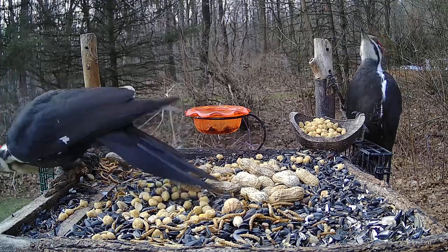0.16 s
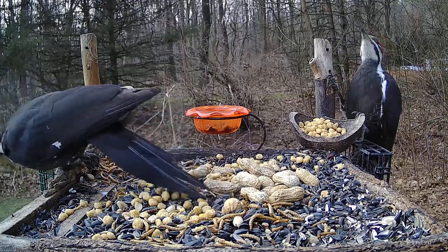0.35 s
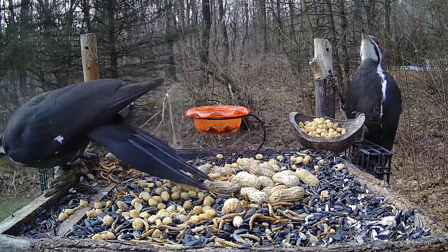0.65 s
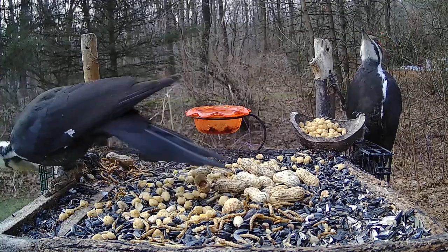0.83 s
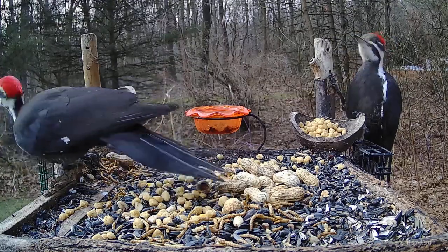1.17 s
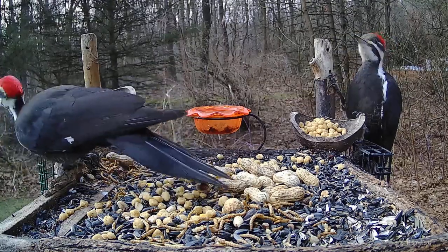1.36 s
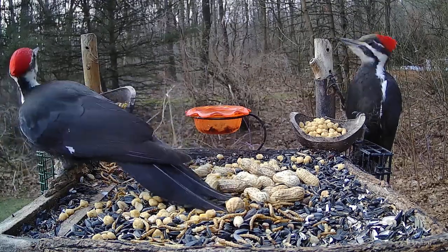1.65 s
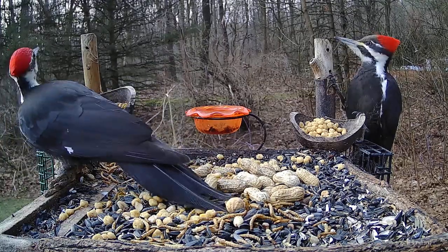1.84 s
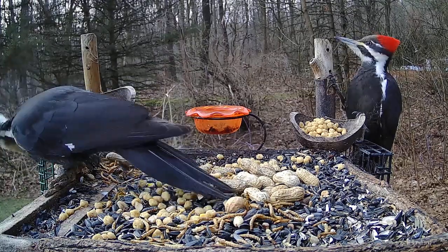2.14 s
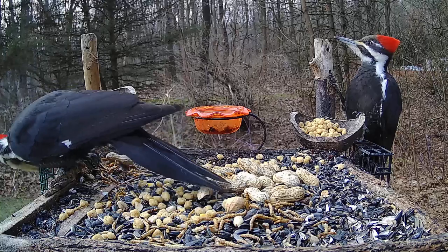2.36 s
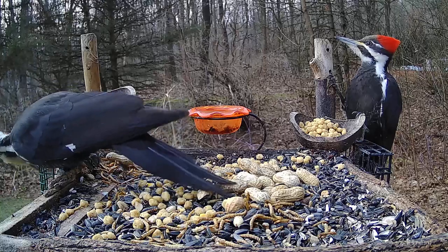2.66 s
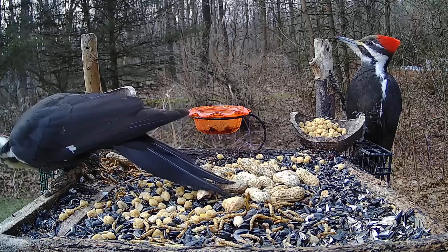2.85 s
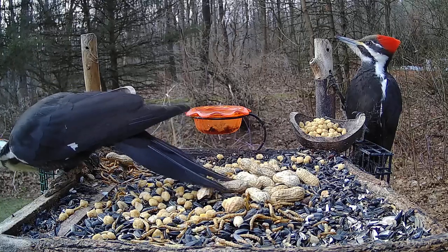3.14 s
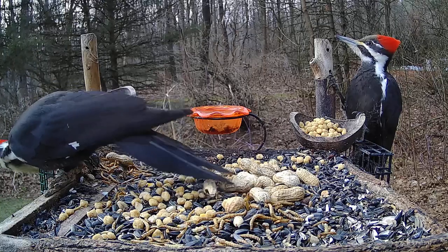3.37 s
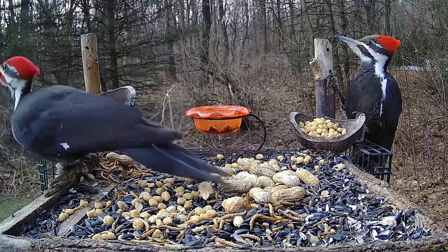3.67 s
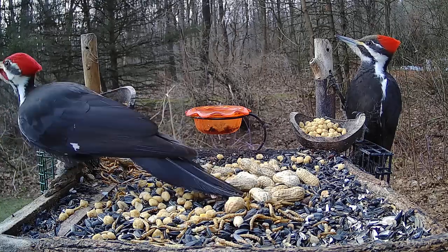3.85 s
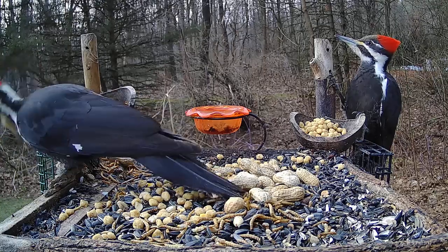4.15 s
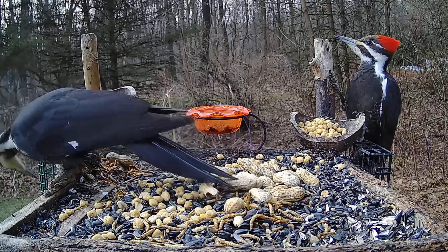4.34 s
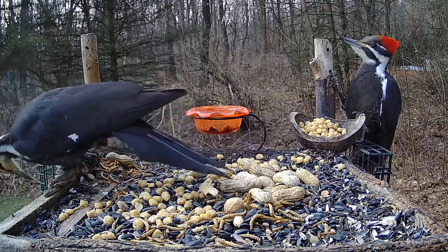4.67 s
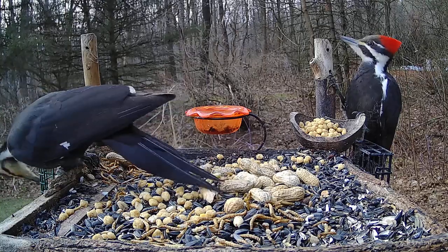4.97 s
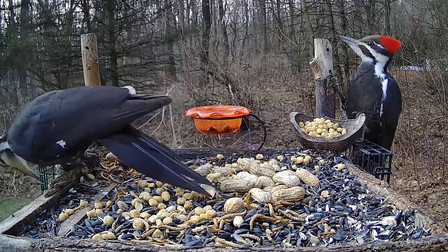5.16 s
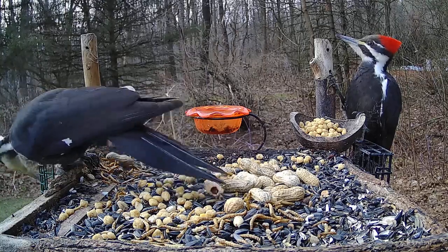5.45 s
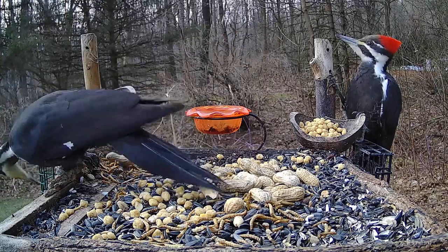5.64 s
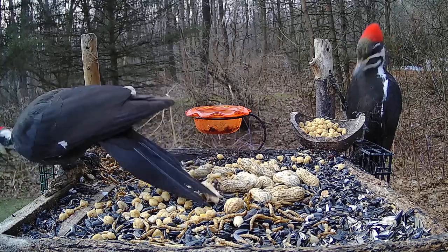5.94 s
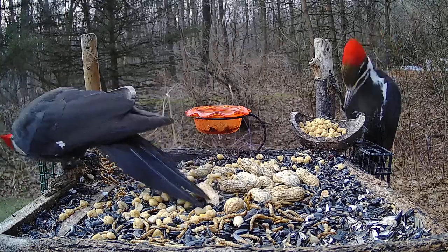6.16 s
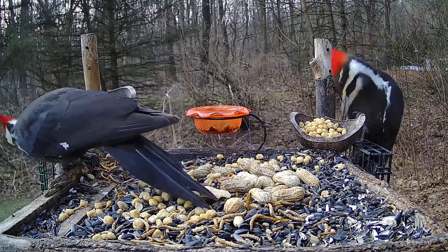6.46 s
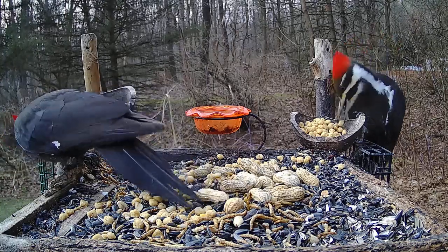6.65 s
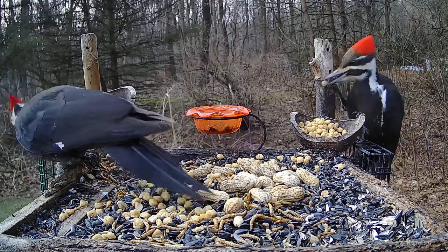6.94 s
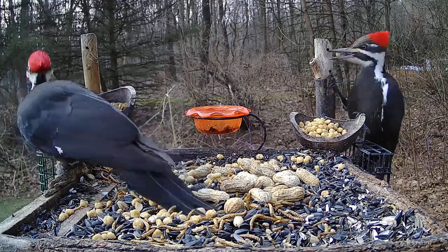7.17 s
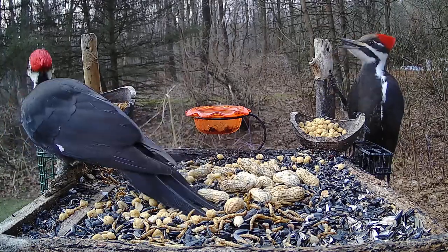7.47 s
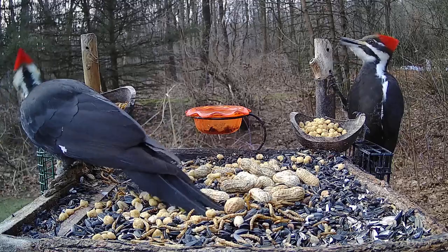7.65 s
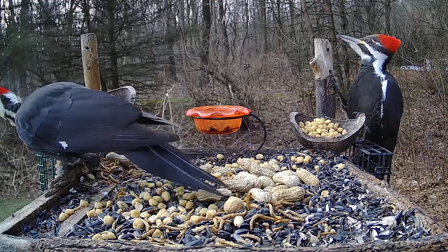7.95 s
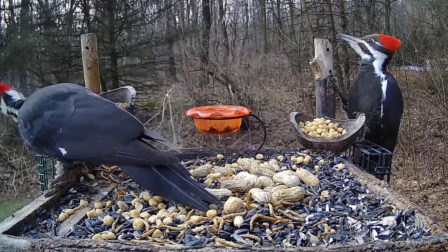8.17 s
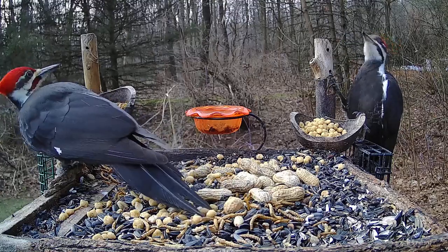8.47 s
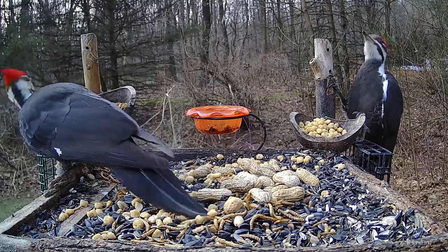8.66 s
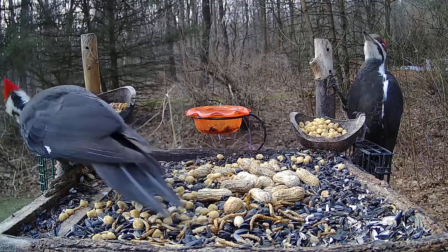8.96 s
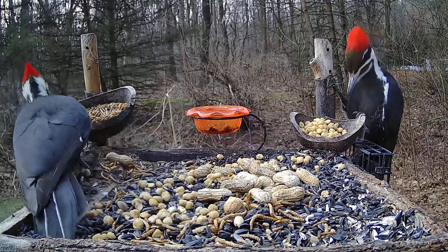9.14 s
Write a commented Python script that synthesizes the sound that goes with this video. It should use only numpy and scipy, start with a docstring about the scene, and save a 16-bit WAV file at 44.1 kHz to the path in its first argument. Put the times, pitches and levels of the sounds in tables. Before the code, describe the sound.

A quiet outdoor bed of distant low rumble, thin hiss and a barely audible high whine. Far engine hum swells over the first 2.5 seconds; another overlaps from about 1 and fades around 6. Close hollow woodpecker blows land on the wooden tray at 0.45, 0.7 and 1.05, growing stronger, with seed crunch, shell snaps, loose clatter and a deep post sway. Weaker, duller knocks come at 2.6, 3.2, 3.65 and 5.3, then the hardest at 5.65. A second bird knocks a side cup at 6.5, followed by a very faint peck, a rub and small taps around 7. Sharp rising chips recur roughly every second until 8.25, clearest from 4 to 6, among tiny pips. Nasal falling mews echo at 1.7, 4.35, 6 and 8.6. Faint warbles appear near 3.7 and 8; distant hoarse cawing runs from 4 to 7.8, clearest at 5.8. Faint taps end near 9.3.

```python
"""Low rumble, thin hiss and the hum of far engines; then a big woodpecker hammers at a wooden feeder. Each blow
builds up ringing board modes beside a crunch of noise, and a slow post sway; loose seed and fittings clack as
noise bursts. A second bird pecks a side cup. Birds chip, pip, mew, warble and caw as gliding sines with noise-
made echoes of the winter woods. The hum swells as the engines' firing rate passes a resonance."""
import sys
import numpy as np
from scipy import signal
from scipy.fft import rfft, irfft
from scipy.io import wavfile
from scipy.ndimage import uniform_filter1d

SR = 44100
rng = np.random.default_rng(int(sys.argv[2]) if len(sys.argv) > 2 else 0)


def file_out(sig):
    """Save sig as 16-bit WAV at sys.argv[1]."""
    # one column per channel
    cols = np.atleast_2d(sig).T
    # limit, then scale
    lim = np.clip(cols, -1, 1)
    pcm = np.round(lim * 32767).astype(np.int16)
    wavfile.write(sys.argv[1], SR, pcm)


N = 410571
T = np.arange(N) / SR


def undb(db):
    """Decibels to gain."""
    return 10 ** (np.asarray(db) / 20)


def unit(x):
    """Scale to rms 1."""
    return x / np.sqrt(np.mean(x ** 2))


def add(out, start_s, x):
    """Mix x into out from start_s."""
    i = max(int(start_s * SR), 0)
    out[i:i + len(x)] += x[:max(N - i, 0)]


def curves(rows, t):
    """Columns of a table joined by straight lines in time."""
    time_s, *columns = np.transpose(rows)
    return [np.interp(t, time_s, column) for column in columns]


def band(x, lo_hz, hi_hz, order=2):
    """Causal band-pass."""
    top_hz = min(max(hi_hz, lo_hz + 10), SR / 2 - 10)
    sos = signal.butter(order, [lo_hz, top_hz], "band", fs=SR, output="sos")
    return signal.sosfilt(sos, x)


def coloured(points, size):
    """Noise with a given level per Hz, interpolated over log frequency."""
    hz, db = np.transpose(points)
    f = np.maximum(np.fft.rfftfreq(size, 1 / SR), 1)
    gain = undb(np.interp(np.log(f), np.log(hz), db))
    return irfft(rfft(rng.standard_normal(size)) * gain, size) * np.sqrt(SR / 2)


def walk(rate_hz, size=N):
    """Smooth random wander of spread 1: held random values, averaged twice."""
    k = max(int(SR / rate_hz), 1)
    held = np.repeat(rng.standard_normal(size // k + 2), k)
    return unit(uniform_filter1d(uniform_filter1d(held, k), k))[:size]


def phase_of(hz):
    """Running phase of a moving pitch."""
    return 2 * np.pi * np.cumsum(hz) / SR


def fade(t, t60_s):
    """Exponential decay by 60 dB in t60_s."""
    return np.exp(-np.log(1000) * t / t60_s)


def gate(t, start_s, end_s, attack_s, release_s):
    """Straight rise, hold at 1, straight fall."""
    return np.clip(np.minimum((t - start_s) / attack_s, (end_s - t) / release_s), 0, 1)


def woods(x, t60_s):
    """Diffuse echo scattered by the trunks: x convolved with decaying noise of unit energy."""
    t = T[:SR]
    echo = rng.standard_normal(SR) * fade(t, t60_s) * (1 - np.exp(-t / 0.0091))
    return signal.fftconvolve(x, echo / np.sqrt(np.sum(echo ** 2)))[:N]


def air():
    """Distant rumble that eases slowly, under thin hiss: one coloured noise split at 900 Hz."""
    # outdoor rumble and microphone hiss: hz, density_db_per_hz
    air_spectrum = [(15, -63.5), (30, -64), (70, -68), (110, -72.5), (150, -82.5), (300, -85), (430, -90.5),
                    (560, -88), (780, -103), (1500, -107.5), (2900, -111), (4000, -114.5), (11000, -113.8),
                    (15500, -117.3)]
    # ease of the rumble: time_s, gain_db
    rumble_ease = [(0, -0.37), (6.0, .5), (7.5, -1.4)]
    noise = coloured(air_spectrum, N)
    ease_db, = curves(rumble_ease, T)
    rumble = signal.sosfiltfilt(signal.butter(2, 900, fs=SR, output="sos"), noise)
    drone = undb(-69.0 + 2 * walk(1.89)) * unit(band(rng.standard_normal(N), 529.5, 589))
    rumble_db = ease_db + .5 * walk(5)
    hiss = (noise - rumble) * undb(.55 * walk(7))
    return hiss + (rumble + drone) * undb(rumble_db)


def engine():
    """Far engines: firing tone, half and double rate; the hum booms as the rate passes a resonance."""
    # one list per engine, gathering speed then easing off: time_s, firing_rate_hz
    engine_runs = [
        [(0, 111.9), (.55, 116.3), (1.3, 119.8), (2.05, 121.8), (2.5, 111.2)],
        [(1.1, 91), (3.25, 105.6), (3.55, 113.6), (5.55, 113.5), (5.9, 103.3), (6.3, 100)],
    ]
    base_db, fade_s = -55, .25
    boom_hz, boom_width_hz, boom_peak_db = 117.05, 4.8, 13
    out = np.zeros(N)
    for run in engine_runs:
        hz, = curves(run, T)
        phase = phase_of(hz * (1 + 0.0041 * walk(10.06)))
        tone = np.sin(phase) + undb(-8) * np.sin(phase / 2) + undb(-24) * np.sin(2 * phase)
        boom_db = boom_peak_db / (1 + ((hz - boom_hz) / boom_width_hz) ** 2)
        waver_db = 1.3 * walk(8)
        level = undb(base_db + boom_db + waver_db)
        out += level * gate(T, run[0][0], run[-1][0], fade_s, fade_s) * tone
    return out


def pips(count=46):
    """Tiny faint pips, as of a foraging flock: short wavering sines, one at random in each time slot."""
    out, t = np.zeros(N), T[:int(.016 * SR)]
    for k, (when, pitch, size) in enumerate(rng.uniform(-1, 1, (count, 3))):
        start_s = (k + .5 + when / 2) * T[-1] / count
        hz = 5650 + 70 * pitch + 110 * walk(450, len(t))
        pip = np.sin(phase_of(hz)) * np.hanning(len(t))
        add(out, start_s, undb(-70.0 + 3.0 * size) * pip)
    return out


def peck(knock_db, sway_db, ring_db, crack_db, build_s, tilt_db, wood):
    """One blow: the bill crunches in for some milliseconds while the boards build up their ring."""
    # dense small resonances of boards and seed: hz, relative_db
    grain_spectrum = [(80, -1.5), (280, -4.5), (600, -6.5), (880, -8), (1150, -3), (1400, -17),
                      (1600, -15.5), (1950, -13.5), (2300, -10.5), (2600, -20), (3250, -18), (3900, -32.5),
                      (6000, -40), (11000, -40), (16000, -58)]
    post_hz, post_t60_s = 46.9, 0.51
    t = T[:SR // 2]
    hz, db, t60_s = np.transpose(wood)[:, :, None]
    low = hz < 880
    # every blow lands on another spot, which detunes and weights the modes anew
    hz = hz * (1 + 0.0074 * rng.standard_normal(hz.shape))
    spot_db = 1.5 * rng.standard_normal(hz.shape)
    size = undb(db + low * tilt_db * np.log2(hz / 300) + spot_db)
    swell = 1 - np.exp(-(t / np.where(low, build_s, .006)) ** 2)
    ring = np.sin(2 * np.pi * (hz * t + rng.random(hz.shape)))
    modes = size * swell * fade(t, t60_s) * ring
    # seed and small resonances crunch as long as the bill pushes, with a weak tail
    onset = 1 - np.exp(-(t / 0.0045) ** 0.79)
    push = onset * (np.exp(-(t / 0.023) ** 2) + undb(-10) * fade(t, 0.27))
    grain = coloured(grain_spectrum, len(t)) * push * undb(2.4 * walk(377, len(t)))
    edges_hz = [80, 880, 1600, 16000]
    levels_db = (knock_db, ring_db, crack_db)
    grains_db = (-6, -0.5, 7)  # grain against modes
    out = 0
    for lo, hi, level_db, grain_db in zip(edges_hz, edges_hz[1:], levels_db, grains_db):
        band_modes = modes[(hz[:, 0] >= lo) & (hz[:, 0] < hi)].sum(0)
        part = unit(band_modes) + undb(grain_db) * unit(band(grain, lo, hi))
        out = out + undb(level_db) * part / np.std(part[:SR // 25])  # level over the first 40 ms
    # the post swings slowly after the blow
    sway = np.sin(2 * np.pi * post_hz * t) * fade(t, post_t60_s) * (1 - np.exp(-(t / 0.024) ** 2))
    return out + undb(sway_db) * sway


def contact(t, t60_s):
    """Noise of two hard surfaces meeting: sub-millisecond onset, exponential decay."""
    return rng.standard_normal(len(t)) * fade(t, t60_s) * (1 - np.exp(-t / 0.00055))


def rattle(clack_db, edge_db):
    """A small hard piece lands on the tray: a dry clack with a bright edge, each set by its peak."""
    t = T[:SR // 10]
    clack = band(contact(t, 0.026), 1010, 1444)
    edge = band(contact(t, 0.018), 2940, 3360) + undb(-25.5) * contact(t, 0.0054)
    return undb(clack_db) * clack / np.abs(clack).max() + undb(edge_db) * edge / np.abs(edge).max()


def chatter(knock_db):
    """Loose fittings jump at a blow and fall back one after another; a weak blow barely lifts them."""
    # same pieces at every tray blow; full_lift_db is the knock that lifts one fully:
    # delay_s, clack_db, edge_db, full_lift_db
    rebounds = [(.022, -33, -33.5, -25), (0.0394, -32.5, -43, -36), (.051, -46.5, -50, -29),
                (.063, -44.5, -61, -36.5), (.117, -47.5, -66, -34), (.130, -54, -69, -34)]
    # per dB short of full lift: weaker clack (dB), weaker edge (dB), later landing (s)
    clack_drop_db, edge_drop_db, lag_s = 2.5, 6.5, .0009
    out = np.zeros(N)
    for delay_s, clack_db, edge_db, full_lift_db in rebounds:
        short_db = max(full_lift_db - knock_db, 0)
        piece = rattle(clack_db - clack_drop_db * short_db, edge_db - edge_drop_db * short_db)
        add(out, delay_s + lag_s * short_db, piece)
    return out


def rub(middle_s, half_s, lo_hz, hi_hz, level_db):
    """Bill and claws rub over wood: uneven band noise that swells and dies."""
    t = T[:int(6 * half_s * SR)] - 3 * half_s
    noise = unit(band(rng.standard_normal(len(t)), lo_hz, hi_hz))
    grit = noise * undb(3.5 * walk(148.6, len(t)))
    return middle_s + t[0], undb(level_db) * grit * np.exp(-(t / half_s) ** 2)


def snap(peak_db):
    """A seed shell splits: a short burst of bright noise."""
    t = T[:SR // 30]
    burst = rng.standard_normal(len(t)) * fade(t, 0.01) * (1 - np.exp(-t / 0.00037))
    crack = band(burst, 2500, 7700, order=1)
    return undb(peak_db) * crack / np.abs(crack).max()


def feeder():
    """All blows, rattles, snaps and scrapes, carried to the microphone through the wood."""
    # blows of the bill on the tray: start_s, knock_db, hollow_ring_db, build_up_s, low_tilt_db_per_octave
    tray_pecks = [(0.452, -36, -47, .0059, -1.5), (0.729, -30, -45.5, 0.0075, 0),
                  (1.062, -27.5, -40, 0.0069, 0), (2.594, -47.5, -56.5, 0.014, -3),
                  (3.183, -38.5, -50, 0.022, 2), (3.657, -40.5, -54, 0.031, -0.5),
                  (5.315, -46, -60, 0.021, -2), (5.643, -25.5, -39, 0.0045, -1.5)]
    # modes of the feeder: hz, relative_db, t60_s
    tray_modes = [(122.4, -13.5, 0.43), (151, -5.5, 0.22), (192.3, -8, 0.33), (243.7, 0.5, 0.12),
                  (278, 2, 0.2), (301.7, -0.5, 0.19), (322, -4.5, 0.24), (387.7, -13, 0.24),
                  (464.6, -19, 0.22), (540, -13.5, 0.28), (743, -8.5, 0.15), (1112, 6.5, 0.12),
                  (1173, -7, 0.25), (1280, -2, 0.13), (1390, -6, 0.12), (1843, 0, 0.068), (2042, 1, 0.036),
                  (2252, 2.5, 0.042), (2750, 3, 0.028), (3140, 1, 0.041), (3350, -14, 0.042)]
    # second bird's blows in the side cup: start_s, knock_db, hollow_ring_db, build_up_s
    cup_pecks = [(6.468, -37, -47, 0.0055), (6.851, -64, -65, .008)]
    # modes of the side cup: hz, relative_db, t60_s
    cup_modes = [(247, -9, 0.092), (313.6, 1.5, 0.13), (333.4, -4, 0.27), (389, -5, 0.12),
                 (446, -20, 0.093), (546, -0.5, 0.13), (772, -4.5, 0.092), (1103, 6, 0.069),
                 (1200, -3, 0.067), (1300, -15, 0.052), (2000, 5, 0.048), (2330, 3, 0.047)]
    # light taps of bills and claws: start_s, clack_db, edge_db
    taps = [(2.72, -50, -70), (3.8492, -56, -71), (6.9478, -52, -72), (6.9701, -51.5, -75),
            (7.1199, -50.5, -61), (7.2878, -53, -64), (9.007, -57, -71), (9.296, -57, -69)]
    # sharp snaps of seed shell: start_s, peak_db
    snaps = [(0.735, -41), (0.836, -54), (1.058, -38), (1.0654, -46), (1.0829, -43), (2.194, -47),
             (6.9691, -50.5)]
    # rubs over wood: middle_s, half_length_s, low_hz, high_hz, level_db
    rubs = [(0.732, 0.0053, 700, 3400, -62), (5.382, 0.045, 910, 1340, -67),
            (5.454, .03, 1020, 1480, -68.5), (6.965, 0.085, 292, 319, -54.5),
            (9.301, 0.0087, 1090, 3280, -65)]
    # the crack keeps in step with the knock; the sway grows by fewer dB
    crack_re_knock_db, full_blow_db, full_sway_db, sway_db_per_db = -16.5, -25, -19.5, 0.6
    cup_crack_re_ring_db, cup_sway_db = -11, -43
    out = np.zeros(N)
    for start_s, knock_db, ring_db, build_s, tilt_db in tray_pecks:
        sway_db = full_sway_db + sway_db_per_db * (knock_db - full_blow_db)
        crack_db = knock_db + crack_re_knock_db
        add(out, start_s, peck(knock_db, sway_db, ring_db, crack_db, build_s, tilt_db, tray_modes))
        add(out, start_s, chatter(knock_db))
    for start_s, knock_db, ring_db, build_s in cup_pecks:
        crack_db = ring_db + cup_crack_re_ring_db
        blow = peck(knock_db, cup_sway_db, ring_db, crack_db, build_s, 0, cup_modes)
        add(out, start_s, band(blow, 30, 2700))  # the cup's side post passes little treble
    for rows, sound in ((taps, rattle), (snaps, snap)):
        for start_s, *row in rows:
            add(out, start_s, sound(*row))
    for row in rubs:
        add(out, *rub(*row))
    return out


def chips():
    """Fast upward flicks, loudest on the way up; the echo stays alike whichever way the bird faces."""
    # thin notes of a small bird that turns its head: start_s, direct_level_db
    chip_notes = [(0.948, -62), (1.894, -53), (3.134, -51), (4.119, -46.5), (5.023, -48), (6.171, -47),
                  (7.387, -70), (8.251, -57.5)]
    start_hz, top_hz, rise_s, length_s = 5340, 7780, 0.0052, 0.028
    accent_s, accent_width_s, hold_db = 0.0042, .003, -9
    direct, spread = np.zeros(N), np.zeros(N)
    t = T[:int(length_s * SR)]
    hz = top_hz + (start_hz - top_hz) * np.exp(-(t / rise_s) ** 1.5)
    accent = np.exp(-((t - accent_s) / accent_width_s) ** 2)
    size = accent + undb(hold_db) * gate(t, 0, length_s, accent_s, .006)
    for start_s, level_db in chip_notes:
        waver = .008 * walk(400, len(t))
        note = size * np.sin(phase_of(hz * (1 + waver)))
        add(direct, start_s, undb(level_db) * note)
        add(spread, start_s, note)
    return direct + undb(-63.0) * woods(spread, 0.71) + undb(-62.0) * woods(spread, 0.092)


def mew(length_s):
    """A nasal, sagging call, hoarser as it runs out; partials in the throat's resonance are favoured."""
    # partials of the call: multiple, relative_db
    mew_partials = [(2, -4), (3, -0.9), (4, -4), (6, -19)]
    base_hz, scoop_hz, scoop_s, sag_hz_per_s, droop_hz = 920, 161.4, 0.00794, 200, 71.6
    start_db, attack_s, release_s = -6.5, 0.12, .06
    t = T[:int(length_s * SR)]
    spent = t / length_s
    hz = base_hz - scoop_hz * np.exp(-t / scoop_s) - sag_hz_per_s * t - droop_hz * spent ** 6
    attack = undb(start_db * np.maximum(1 - t / attack_s, 0))
    size = attack * gate(t, 0, length_s, 0.0013, release_s)
    hoarse = .028 * spent ** 3 * walk(500, len(t))
    phase = phase_of(hz * (1 + 0.0052 * walk(49.4, len(t)) + hoarse))
    call = 0
    for k, db in mew_partials:
        throat_db = 6 * np.exp(-((k * hz - 3250) / 150) ** 2)
        flutter_db = 1.2 * walk(40, len(t))
        call = call + undb(db + throat_db + flutter_db) * np.sin(round(k) * phase)
    return size * call


def mews():
    """The mews come from among the trees, with a later echo off far trunks."""
    # nasal falling mews: start_s, length_s, level_db
    mew_calls = [(1.732, 0.29, -61), (4.35, 0.27, -62.5), (5.964, .29, -62.5), (8.583, 0.32, -65)]
    out = np.zeros(N)
    for start_s, length_s, level_db in mew_calls:
        add(out, start_s, undb(level_db) * mew(length_s))
    far_trunks = np.pad(woods(out, 1.0), (int(.07 * SR), 0))[:N]
    return out + undb(-6.5) * woods(out, 0.67) + undb(-8.5) * far_trunks


def warbles():
    """Swooping sine phrases from deep in the woods, half lost in their echo."""
    # phrases, level ahead of the echo mix: start_s, level_db
    phrases = [(3.66, -73.5), (3.961, -72), (7.649, -73), (7.978, -70), (8.309, -70.5)]
    # one phrase, a swoop up and two wavers: time_s, pitch_hz, relative_db
    phrase_shape = [(0, 2150, -3), (.05, 2346, -2.5), (.066, 2550, 4.5), (.095, 2800, -10),
                    (.125, 2250, -3), (.175, 2500, 2), (.2, 2700, -18), (.235, 2300, -3), (.29, 2600, -16)]
    out, t = np.zeros(N), T[:int(phrase_shape[-1][0] * SR)]
    hz, shape_db = curves(phrase_shape, t)
    for start_s, level_db in phrases:
        wavering_hz = hz * (1 + 0.0265 * walk(249.2, len(t)))
        add(out, start_s, undb(level_db + shape_db) * np.sin(phase_of(wavering_hz)))
    return undb(-1.5) * out + undb(1.5) * woods(out, 1.0)


def cawing():
    """Hoarse calls repeated so far off that mostly their echo arrives; the run slowly grows louder."""
    start_s, end_s, fade_s = 4.07, 7.8, 0.42
    start_db, growth_db_per_s = -76, 1
    cycle = np.cumsum(3.2 * (1 + .2 * walk(3.3))) / SR % 1  # about 3.2 calls a second
    hz = 1310 * (1 + 0.0801 * (cycle - .5) + .075 * walk(500))
    notes = np.sin(phase_of(hz)) * np.sin(np.pi * cycle)
    size = undb(start_db + growth_db_per_s * (T - start_s))
    echoed = unit(woods(notes, 1.0) + .5 * notes)
    return size * gate(T, start_s, end_s, fade_s, fade_s) * echoed


def caw():
    """One far caw carries more clearly: a short hoarse arch of pitch and level."""
    start_s, length_s, level_db = 5.818, 0.1, -59
    out, t = np.zeros(N), T[:int(length_s * SR)]
    arch = np.sin(np.pi * t / t[-1])
    hz = 1200 + 190 * arch + 70 * walk(400, len(t))
    add(out, start_s, undb(level_db) * arch * np.sin(phase_of(hz)))
    return out + undb(-8) * woods(out, 0.56)


def whine():
    """Faint steady electronic whine: fixed sines."""
    # tones: hz, level_db
    whine_tones = [(9001, -94.5), (12000, -86)]
    return sum(undb(db) * np.sin(2 * np.pi * hz * T) for hz, db in whine_tones)


def scene():
    """All sources sum to one signal; only faint treble hiss, of opposite sign, differs by channel."""
    birds = chips() + pips() + mews() + warbles() + cawing() + caw()
    side = undb(-78.5) * unit(band(rng.standard_normal(N), 5200, 14000, order=4))
    return feeder() + birds + engine() + air() + whine() + side * np.array([[1], [-1]])


def record(dry):
    """Steep elliptic low-pass: the treble stops at 15.55 kHz."""
    return signal.sosfilt(signal.ellip(10, .2, 80, 15550, fs=SR, output="sos"), dry)


dry = scene()
out = record(dry)
file_out(out)
```